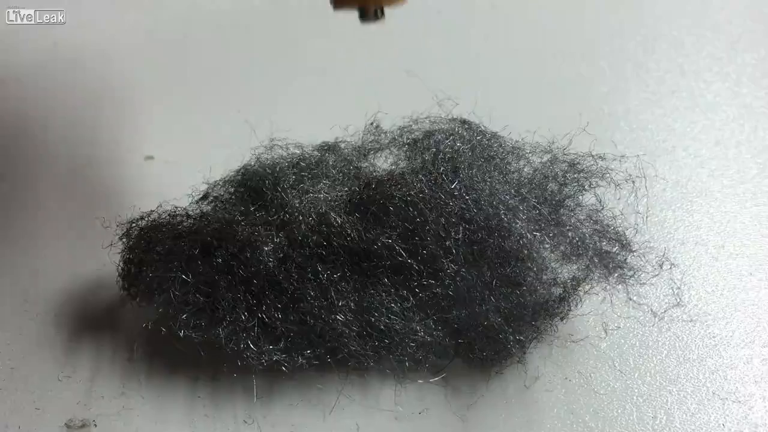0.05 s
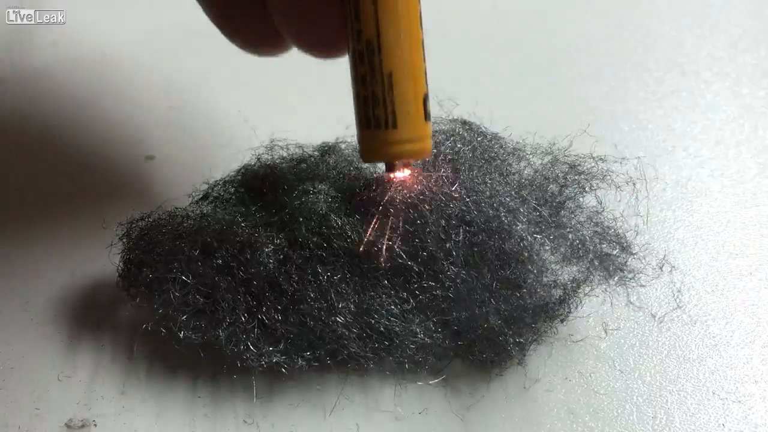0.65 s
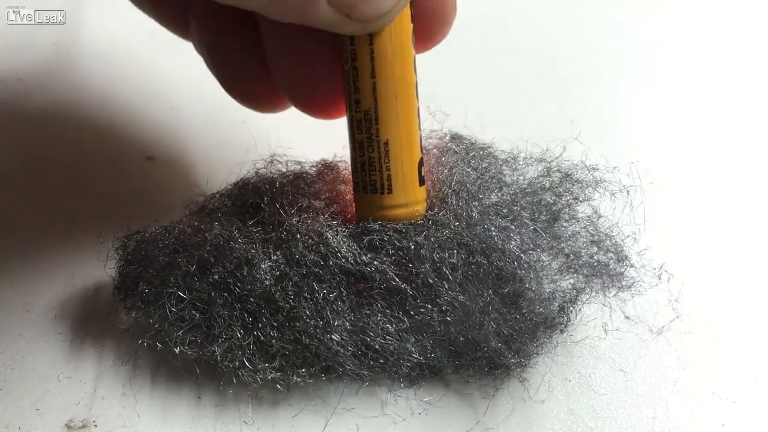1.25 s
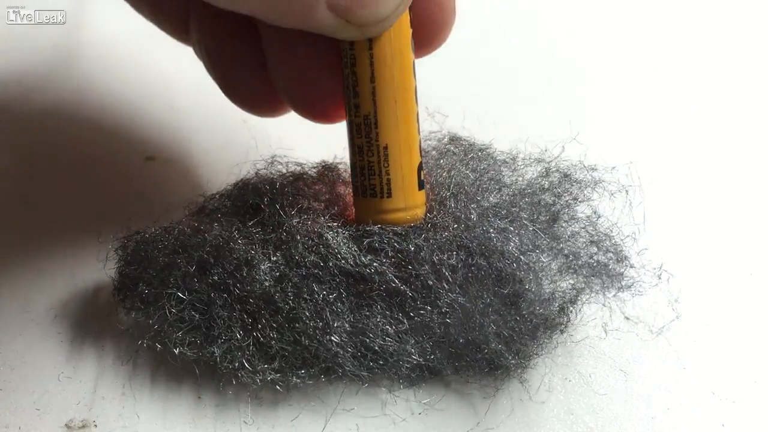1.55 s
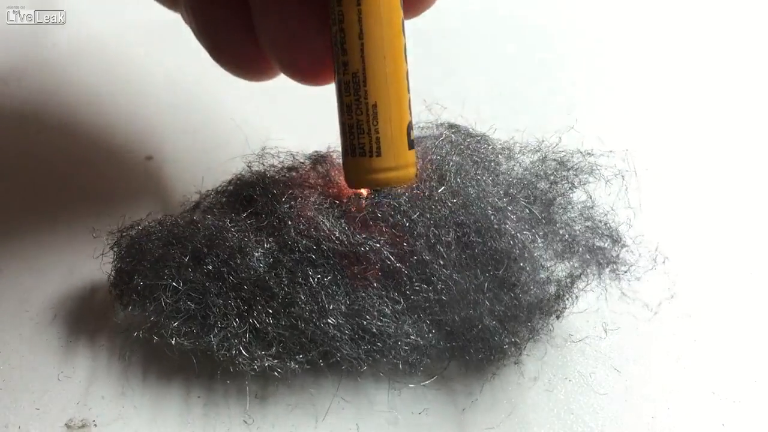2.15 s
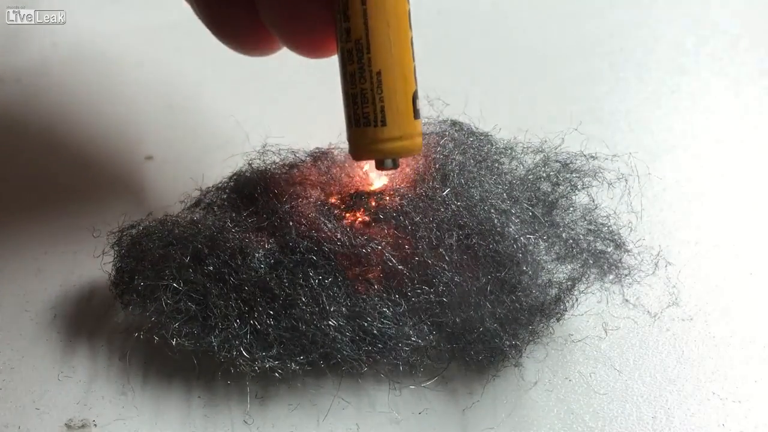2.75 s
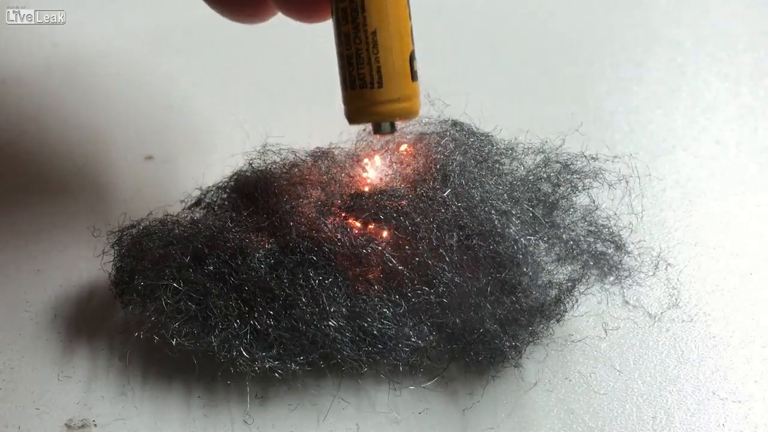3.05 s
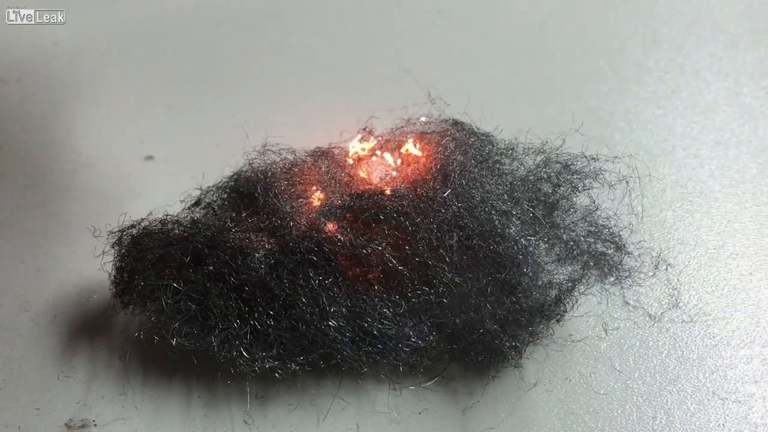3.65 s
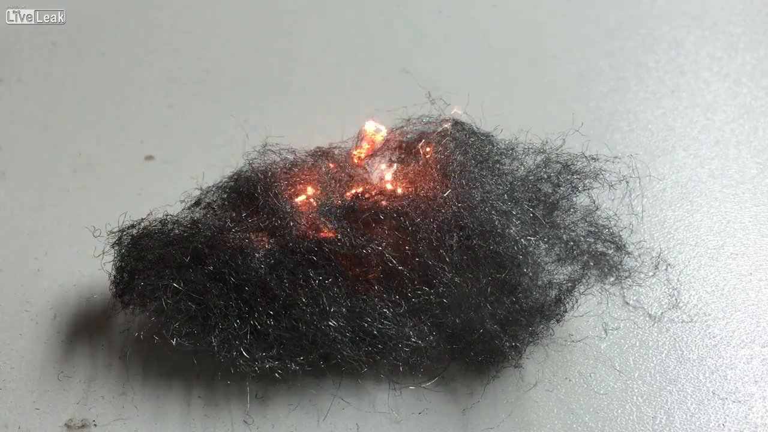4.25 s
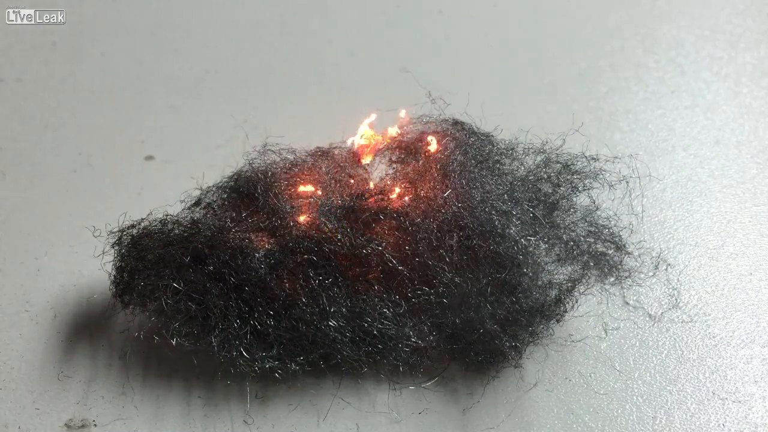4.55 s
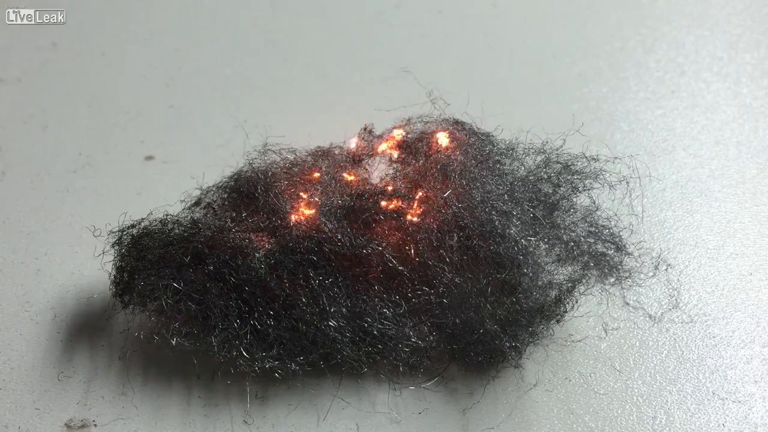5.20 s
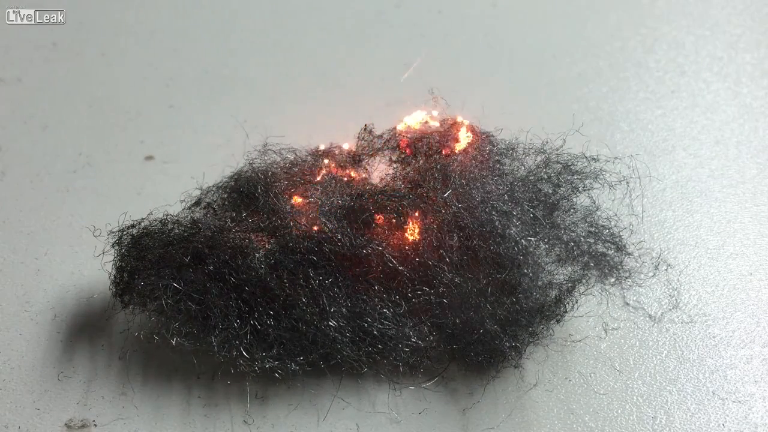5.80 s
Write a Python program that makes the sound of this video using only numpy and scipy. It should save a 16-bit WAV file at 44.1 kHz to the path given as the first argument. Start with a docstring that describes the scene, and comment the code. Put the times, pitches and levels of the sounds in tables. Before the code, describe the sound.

A small battery is pressed into a pad of steel wool on a table, giving a short flurry of sharp crackling sparks. Single thin ticks follow, growing sparser and fainter. The wool then smoulders almost silently, with one soft hiss and a couple of faint dull knocks as it settles. The sound is close, in a quiet room with mains hum and a slight low rumble.

```python
"""Steel wool sparks as a small battery is pressed into it on a table in a quiet room.
The fibres short the battery and melt through, each with a snap: first a crackling flurry, then single
thin ticks. The wool smoulders on almost silently, with one soft hiss and a few dull knocks as it settles.
Behind it are mains hum, the faint buzz of an appliance, a motor's low swelling rumble and room air."""
import sys
import numpy as np
from scipy import signal
from scipy.fft import rfft, irfft
from scipy.io import wavfile

SR = 44100
rng = np.random.default_rng(int(sys.argv[2]) if len(sys.argv) > 2 else 0)


def materialize(psi):
    """Save the field psi as 16-bit PCM at rate SR to the path in sys.argv[1].

    A 1-D psi becomes a single channel; in a 2-D psi each row is a channel.
    """
    bounded = np.clip(np.atleast_2d(psi).T, -1, 1)
    quanta = np.round(bounded * 32767).astype(np.int16)
    wavfile.write(sys.argv[1], SR, quanta)


N = 265923
TIME = np.arange(N) / SR
MAINS_HZ = 50
TREBLE_TOP_HZ, CUTOFF_HZ = 7700, 8882   # a sharp and a gentler limit on the treble


def from_db(db):
    """Turn decibels into a factor to multiply by."""
    return 10 ** (np.asarray(db) / 20)


def unit_power(x):
    """Scale a signal so that its average power is 1."""
    return x / np.sqrt(np.mean(x ** 2) + 1e-20)


def db_at(points, hz):
    """Read levels between (Hz, dB) points, with the octaves evenly spaced."""
    point_hz, db = np.transpose(points)
    return np.interp(np.log(hz + 1), np.log(point_hz), db)


def coloured_noise(colour):
    """Noise of power 1, shaped by (Hz, dB) points."""
    gain = from_db(db_at(colour, np.fft.rfftfreq(N, 1 / SR)))
    return unit_power(irfft(rfft(rng.standard_normal(N)) * gain, N))


def drift(rate_hz):
    """A random wobble of typical size 1, mostly slower than rate_hz."""
    gain = 1 / (1 + (np.fft.rfftfreq(N, 1 / SR) / rate_hz) ** 2)
    return unit_power(irfft(rfft(rng.standard_normal(N)) * gain, N))


def swells(rows, attack_s, release_s):
    """A loudness curve from (start, length, dB) rows: each rises, holds to its end and dies away."""
    power = np.zeros(N)
    for start, length, db in rows:
        rise = np.clip((TIME - start) / attack_s, 0, 1)
        fall = np.exp(-np.clip((TIME - start - length) / release_s, 0, 20))
        power += (from_db(db) * rise * fall) ** 2
    return np.sqrt(power)


def resonate(x, hz, width_hz):
    """A resonance: it lets through the sound near hz and weakens the rest."""
    r, w = np.exp(-np.pi * width_hz / SR), 2 * np.pi * hz / SR
    return signal.lfilter(np.array([1, 0, -1]) * (1 - r * r) / 2, [1, -2 * r * np.cos(w), r * r], x)


def ring(clicks, hz, t60):
    """Each click starts a tone of its own height that fades by 60 dB in t60 seconds."""
    r, w = np.exp(-np.log(1000) / (t60 * SR)), 2 * np.pi * hz / SR
    return signal.lfilter([0, np.sin(w)], [1, -2 * r * np.cos(w), r * r], clicks + 1e-18)


def clicks_at(times, db):
    """A one-sample click at each of the times."""
    out = np.zeros(N)
    out[np.round(times * SR).astype(int)] = from_db(db)
    return out


def overtone_change_db(sink_db_per_s=0.53, step_at_s=4.47, step_s=0.36, step_db=4.5):
    """A level that sinks slowly and steps up late on, for the hum's overtones and the rush around them."""
    step = np.clip((TIME - step_at_s) / step_s, 0, 1)
    return step_db * step + sink_db_per_s * (TIME.mean() - TIME)


def room_air(steady_db=-58, rush_db=-71.3, flutter_db=1.5):
    """Steady room noise, plus a softly fluttering rush around the hum's overtones."""
    # The tone colour of the room noise. Each row: frequency in Hz, relative level in dB.
    air_colour = [(20, -13), (35, -2), (50, -0.5), (80, 9), (130, 3), (230, 0.5), (330, -9), (480, -18),
                  (1000, -14), (1700, -17), (2500, -20.5), (3000, -27.5), (4600, -23.5), (7600, -32.5)]
    rush = coloured_noise([(200, -21), (330, -0.5), (560, -1.5), (700, -4.5), (1100, -5.5), (1500, -34)])
    level_db = rush_db + 1.6 * overtone_change_db() + flutter_db * drift(rate_hz=10.5)
    return from_db(steady_db) * coloured_noise(air_colour) + from_db(level_db) * rush


def motor_rumble(motor_hz=62.87, rest_db=-56.5, wander_db=3.0, noise_hz=58, width_hz=24):
    """A motor's low tone and the deep noise around it swell together; its octave follows more gently."""
    # The swells of the rumble. Each row: start in seconds, length in seconds, relative level in dB.
    rumble_swells = [(0.57, 0.3, -49), (1.09, 0.25, -50), (1.56, 0.32, -43), (2.17, 0.18, -47),
                     (2.36, 0.26, -41.5), (3.05, 0.72, -55.5), (4.6, 0.32, -50), (5.3, 0.25, -53.5)]
    rest = from_db(rest_db + wander_db * drift(rate_hz=7.7))
    level_db = 20 * np.log10(np.hypot(rest, swells(rumble_swells, attack_s=0.045, release_s=0.036)))
    phase = 2 * np.pi * (motor_hz * TIME + 0.032 * drift(rate_hz=11.0))
    noise = resonate(rng.standard_normal(N), noise_hz, width_hz)
    noise = unit_power(resonate(noise, noise_hz, width_hz))
    low = from_db(3.5) * np.sin(phase) + from_db(-9) * noise
    octave = from_db(-58 + 0.4 * (level_db - level_db.mean())) * np.sin(2 * phase)
    return from_db(level_db) * low + octave


def appliance_buzz(level_db=-71.5, wander_db=1.0, pulse_db=11.5):
    """The same little rattle comes back on every mains cycle and rings an appliance's casing."""
    # The resonances of the casing. Each row: frequency in Hz, width in Hz, relative level in dB.
    casing_modes = [(1390, 320, -4), (2044, 420, -5), (2695, 45, -3.5), (3310, 69, -6), (4125, 90, 1),
                    (4760, 160, -13.5), (5680, 160, -10), (6820, 150, -10.5)]
    period = round(SR / MAINS_HZ)
    one_cycle = irfft(np.exp(2j * np.pi * rng.random(period // 2 + 1)), period)   # a scrap of noise
    rattle = np.resize(one_cycle, N) * from_db(-pulse_db * np.cos(2 * np.pi * MAINS_HZ * TIME))
    casing = sum(from_db(db) * resonate(resonate(rattle, hz, width), hz, 2 * width)
                 for hz, width, db in casing_modes)
    return from_db(level_db + wander_db * drift(rate_hz=1.1)) * unit_power(casing)


def mains_hum(waver_db=2.0, lowest_waver_db=1.5, swell_share=0.9):
    """Tones at multiples of the mains frequency, each wavering a little; the lowest swells and sinks."""
    # The tones of the hum. Each row: multiple of the mains frequency, middle level in dB.
    hum_tones = [(2, -45.5), (3, -50.5), (4, -50), (5, -66), (6, -67.5), (7, -67.5), (8, -77), (9, -73.5),
                 (10, -77), (11, -69.5), (12, -80), (14, -78), (18, -77), (19, -81.5), (21, -77.5),
                 (25, -74.5), (28, -82), (29, -75.5), (33, -81.5), (40, -80.5)]
    # The shape of the lowest tone's swell. Each row: time in seconds, relative level in dB.
    swell_shape = [(0.15, -48), (0.34, -47.5), (2.18, -51), (2.62, -45), (2.82, -54), (3.43, -47.5),
                   (5.95, -45)]
    swell_db = np.interp(TIME, *np.transpose(swell_shape))
    out = np.zeros(N)
    for multiple, db in hum_tones:
        waver = drift(rate_hz=2.1)
        if multiple == 2:
            change_db = swell_share * (swell_db - swell_db.mean()) + lowest_waver_db * waver
        else:
            change_db = waver_db * waver
        if 7 <= multiple <= 25:
            change_db += overtone_change_db()
        out += from_db(db + change_db) * np.sin(2 * np.pi * (multiple * MAINS_HZ * TIME + rng.random()))
    return out


def echo_tail(t60, delay_s):
    """A wash of echoes, with total energy 1, that starts after a delay and dies away."""
    t = TIME[:SR // 4]
    noise = rng.standard_normal(len(t)) * np.exp(-np.log(1000) * t / t60) * (t > delay_s)
    return noise / np.linalg.norm(noise)


def add_echoes(x, bounce_s=0.000935, bounce_db=-17, near_db=-13, room_db=-24):
    """Sound bounces off the table, scatters from a nearby hand and phone, and lingers in the room."""
    near = echo_tail(t60=0.021, delay_s=bounce_s)
    room = echo_tail(t60=0.17, delay_s=0.004)
    echoes = from_db(near_db) * near + from_db(room_db) * room
    echoes[round(bounce_s * SR)] += from_db(bounce_db)
    return x + signal.fftconvolve(x, echoes)[:N]


def ember_hiss():
    """The embers flare with a brief, soft hiss."""
    # The flare of the embers. Each row: start in seconds, length in seconds, level in dB.
    flares = [(3.26, 0.037, -60)]
    hiss = coloured_noise([(200, -14), (700, 2.5), (2600, -3), (4000, -5), (6500, -9), (9000, -33)])
    return swells(flares, attack_s=0.034, release_s=0.04) * hiss


def settling_knocks(thud_hz=250, thud_t60=0.14, rustle_db=-8, rustle_t60=0.11):
    """The burning pad settles with dry knocks, a rustle of fibres and a low thud from the table."""
    # The knocks of the pad. Each row: time in seconds, strength of the blow in dB, thud level in dB.
    knocks = [(4.1786, -44.5, -58), (4.1783, -38.5, -56), (4.3633, -53.5, -57), (4.385, -62.5, -45)]
    # The tones a knock rings with. Each row: frequency in Hz, gain in dB, seconds to fade by 60 dB.
    knock_modes = [(700, -24, 0.0157), (970, -8, 0.02), (1250, -3.5, 0.015), (1715, 0.5, 0.012),
                   (2430, 2, 0.0073), (2770, 0.5, 0.015), (4430, -3, 0.0042)]
    times, blow_db, thud_db = np.transpose(knocks)
    blows = clicks_at(times, blow_db)
    fading = signal.fftconvolve(blows, np.exp(-np.log(1000) * TIME[:SR // 4] / rustle_t60))[:N]
    same_energy = np.sqrt(2 * np.log(1000) / (rustle_t60 * SR))   # scales a rustle to match its blow
    rustle = fading * rng.standard_normal(N) * same_energy
    push = blows + from_db(rustle_db) * rustle
    ringing = sum((-1) ** k * from_db(db) * ring(push, hz, t60)
                  for k, (hz, db, t60) in enumerate(knock_modes))
    return ringing + ring(clicks_at(times, thud_db), thud_hz, thud_t60)


def snap(tilt_db, uneven_db=2.0, size=512):
    """One spark's tiny pulse of pressure; a tilt below 0 makes it fat, above 0 thin."""
    # The tone colour of a spark with no tilt. Each row: frequency in Hz, relative level in dB.
    spark_colour = [(150, -27), (500, -14.5), (900, -9.5), (1700, -5.5), (2150, -13.5), (2400, -1.5),
                    (3000, -6), (3650, -4.5), (3900, -5.5), (4250, -14.5), (4420, -3), (5600, -2),
                    (6700, -0.5), (7600, -7.5)]
    hz = np.fft.rfftfreq(size, 1 / SR)
    # Each spark sits elsewhere in the tangle, so its colour differs a little.
    uneven = np.interp(hz, np.linspace(0, CUTOFF_HZ, 12), rng.standard_normal(12))
    octaves = np.log2(np.clip(hz, 900, 6500) / 6500)
    gain = from_db(db_at(spark_colour, hz) + tilt_db * octaves + uneven_db * uneven)
    gain /= 1 + (hz / CUTOFF_HZ) ** 8
    # Put all of the pulse after the break of the fibre ("minimum phase").
    fold = np.r_[1, np.full(size // 2 - 1, 2), 1, np.zeros(size // 2 - 1)]
    spectrum = np.exp(rfft(irfft(np.log(gain)) * fold))
    treble = irfft(spectrum * ((hz > 1500) & (hz < TREBLE_TOP_HZ)))
    treble_peak = np.abs(signal.hilbert(treble)).max()
    return -irfft(spectrum) / treble_peak


def scrape_crackle(contacts_per_s=450, boost_db=11.25, spread_db=9.0):
    """Many tiny contacts make and break as the battery's terminal scrapes over the fibres."""
    # The short pushes of the battery. Each row: start in seconds, length in seconds, base level in dB.
    scrapes = [(0.652, 0.027, -51), (0.70, 0.065, -55.5), (0.815, 0.022, -49.5)]
    contacts = rng.random(N) < contacts_per_s / SR
    scraping = swells(scrapes, attack_s=0.008, release_s=0.028)
    sizes = scraping * from_db(boost_db + spread_db * rng.random(N))
    return signal.fftconvolve(contacts * sizes, snap(tilt_db=-3.0))[:N]


def sparks(gain_db=0.5, rise_s=0.00013):
    """Each fibre that melts through gives one snap."""
    # The sparks that stand out. Each row: time in seconds, relative level in dB, tilt in dB per octave.
    spark_events = [(0.6282, -22.5, 0.5), (0.6522, -32, -5), (0.6571, -22.5, -3), (0.665, -27, 12),
                    (0.6674, -19, -0.5), (0.6744, -15, 0), (0.675, -19, 6), (0.6756, -19, -0.5),
                    (0.698, -32, -1), (0.705, -30, 0), (0.708, -27, 3), (0.714, -24.5, 0), (0.7177, -17, 0),
                    (0.7381, -24, -2.5), (0.754, -20.5, -4), (0.7552, -15, 0), (0.793, -28, 1),
                    (0.817, -20, -1), (0.8267, -15.5, -2), (0.8341, -25, 0), (0.8358, -16, 0.5),
                    (0.8447, -14.5, 1), (0.845, -24, -6), (0.8471, -14, -1.5), (0.865, -35.5, 2),
                    (1.1057, -13, 3), (1.1177, -18.5, -4), (1.1774, -16, 3), (1.2723, -36, 9),
                    (1.3632, -32.5, 5.5), (1.4341, -26, 12), (1.4352, -19.5, -0.5), (1.4945, -16, 0.5),
                    (1.5035, -25, 2), (1.7856, -18.5, 6), (1.845, -34.5, 3.5), (1.8847, -32.5, 5),
                    (1.9925, -40, 7), (2.044, -32, 10.5), (2.0924, -46, 5), (2.126, -29.5, 10.5),
                    (2.1843, -45.5, 4), (2.2139, -33.5, 5.5), (2.5583, -52.5, 1), (2.7132, -45.5, -1.5),
                    (4.3632, -37.5, 3.5)]
    out = np.zeros(N)
    for time_s, db, tilt_db in spark_events:
        pulse = snap(tilt_db)
        start = round((time_s - rise_s) * SR)
        out[start:start + len(pulse)] += from_db(db + gain_db) * pulse
    return out


def scene():
    """The burning wool close by, over the sounds of the room."""
    wool = add_echoes(sparks() + scrape_crackle() + settling_knocks())
    room = mains_hum() + appliance_buzz() + motor_rumble() + room_air()
    return (wool + ember_hiss() + room)[None, :]


def record(dry, start_s=0.12, fade_s=0.022):
    """The sound fades in after a moment of silence; the highest treble is cut off."""
    faded_in = dry[0] * np.clip((TIME - start_s) / fade_s, 0, 1)
    sharp_cut = signal.firwin(301, TREBLE_TOP_HZ, fs=SR, window="boxcar")
    gentle_cut = signal.firwin(101, CUTOFF_HZ, fs=SR)
    trimmed = signal.fftconvolve(faded_in, sharp_cut, mode="same")
    return signal.fftconvolve(trimmed, gentle_cut, mode="same")[None, :]


dry = scene()
out = record(dry)
materialize(out)
```